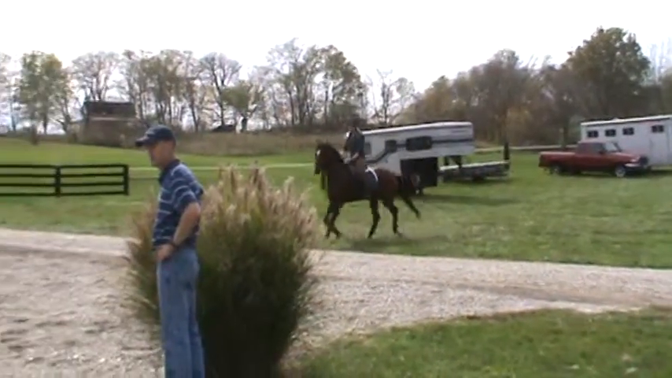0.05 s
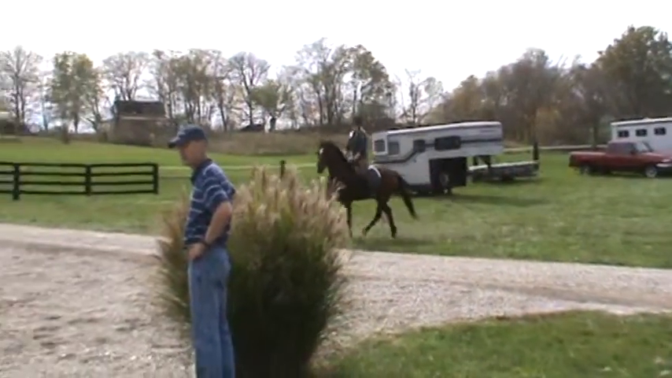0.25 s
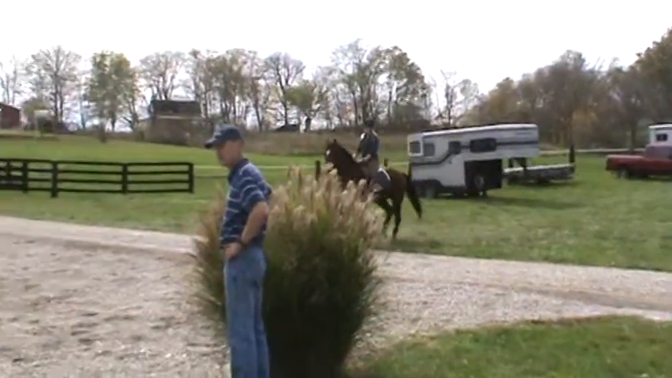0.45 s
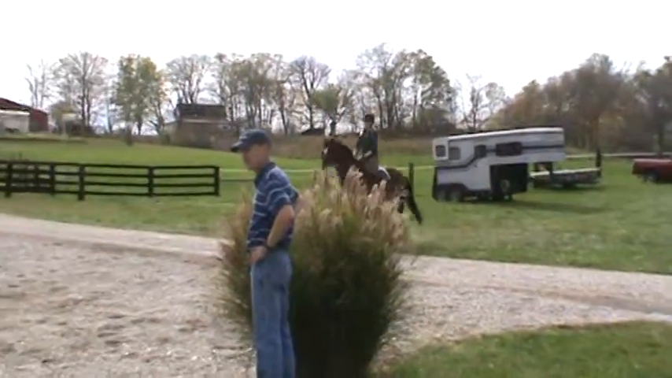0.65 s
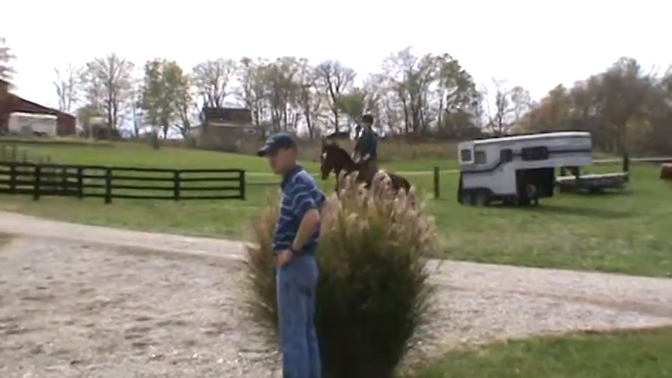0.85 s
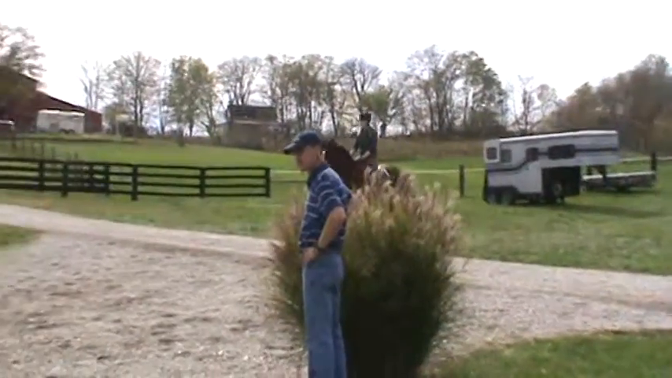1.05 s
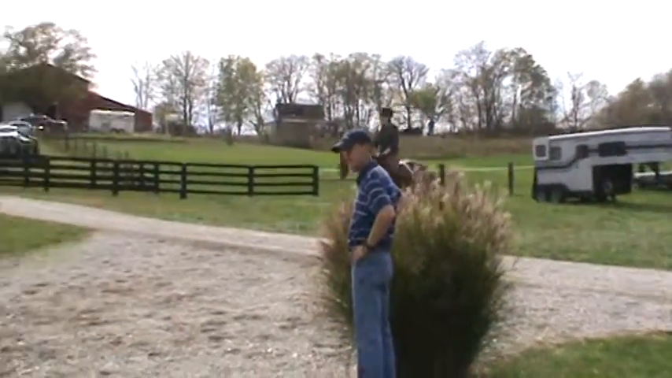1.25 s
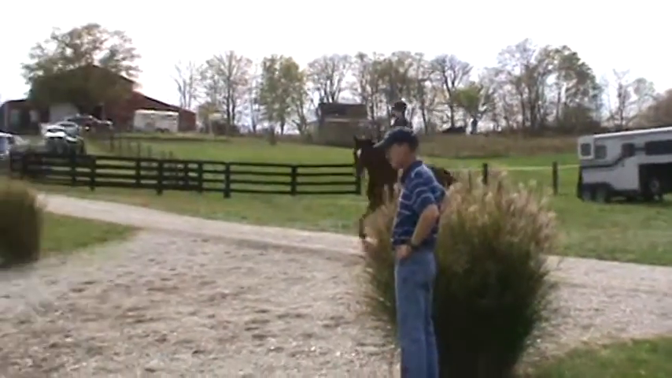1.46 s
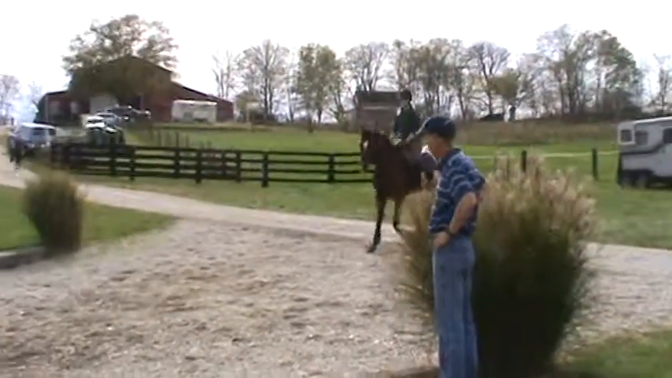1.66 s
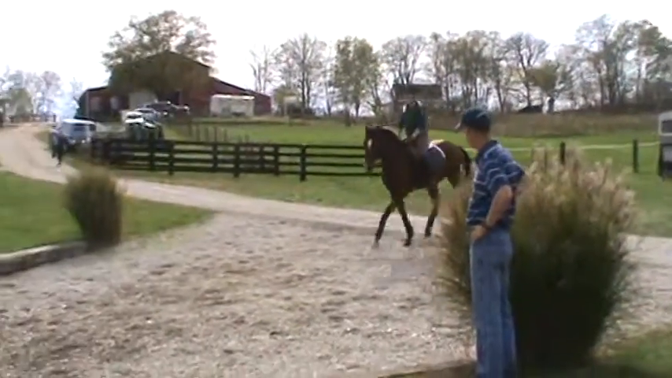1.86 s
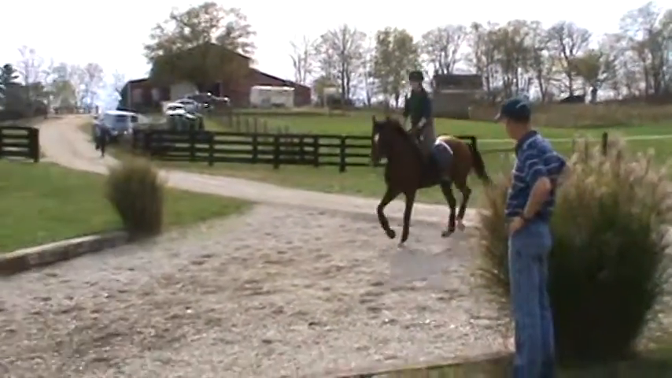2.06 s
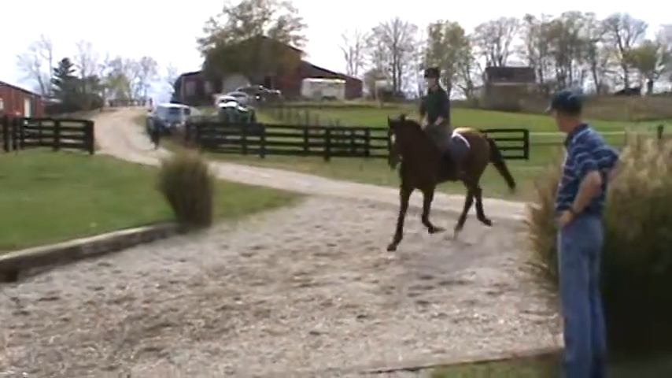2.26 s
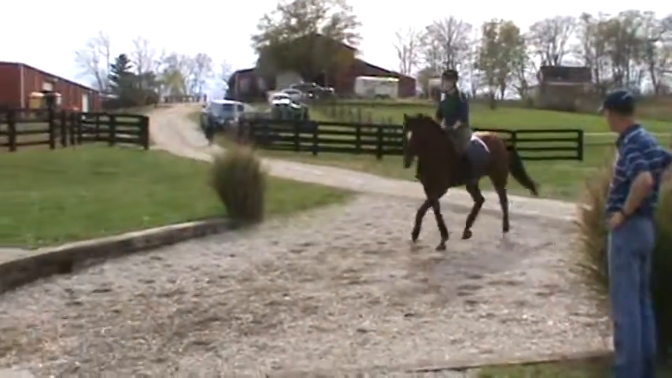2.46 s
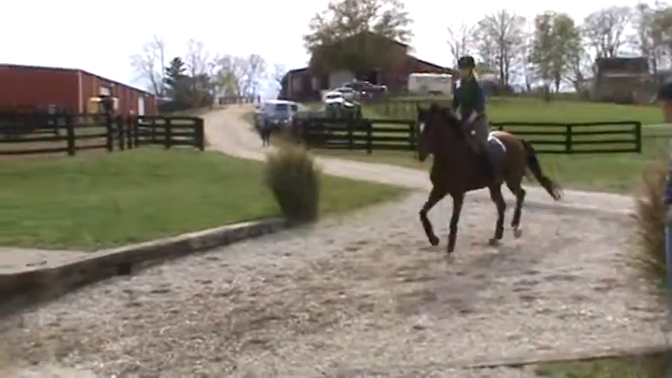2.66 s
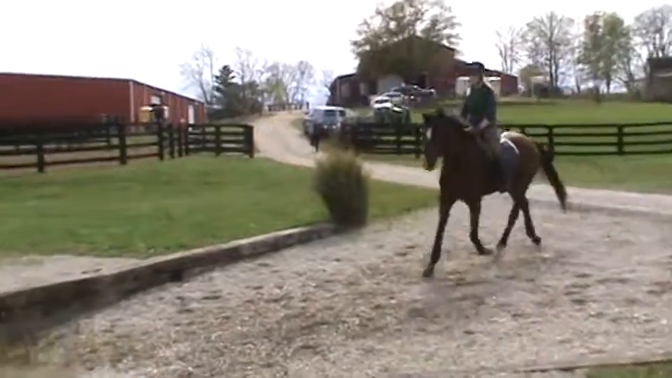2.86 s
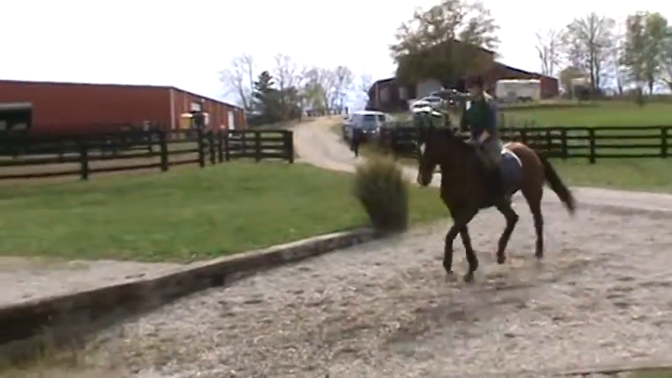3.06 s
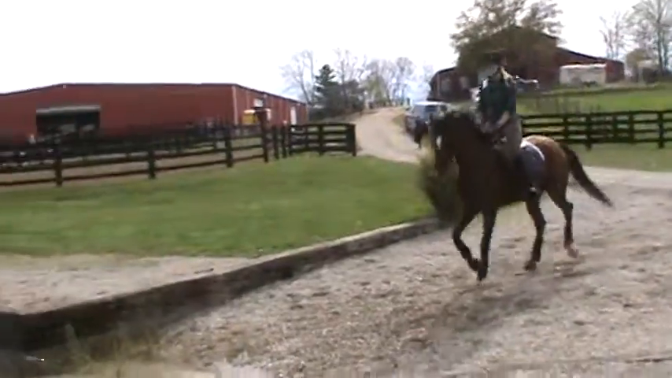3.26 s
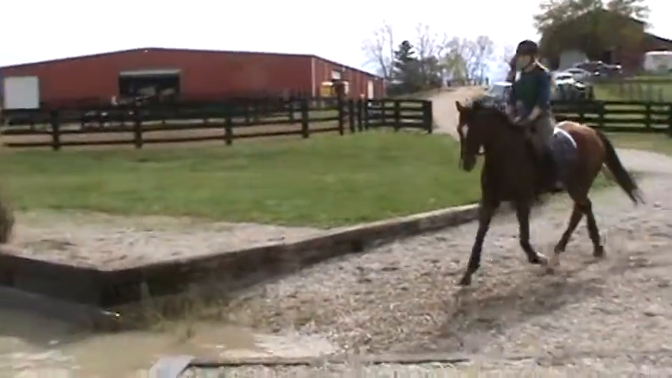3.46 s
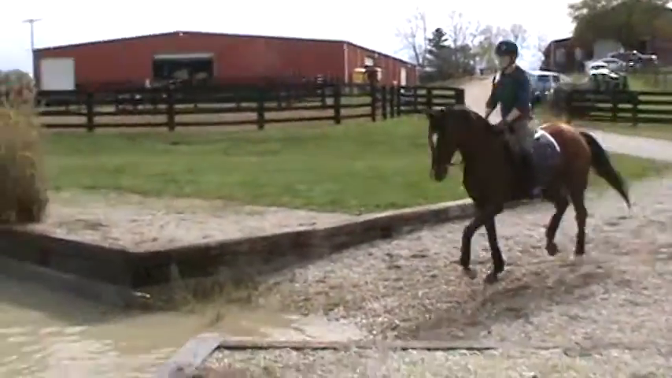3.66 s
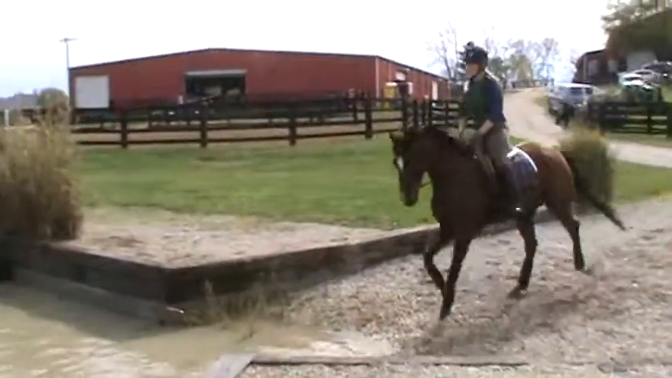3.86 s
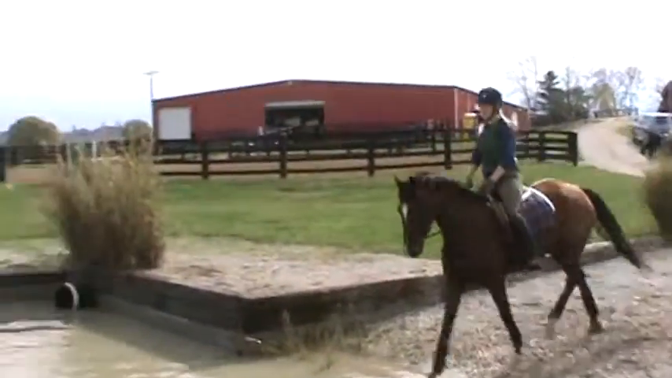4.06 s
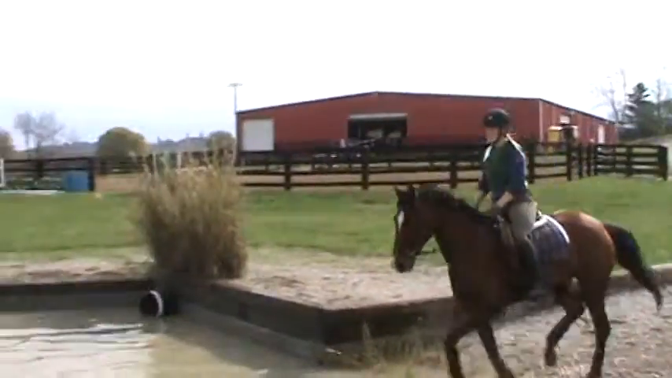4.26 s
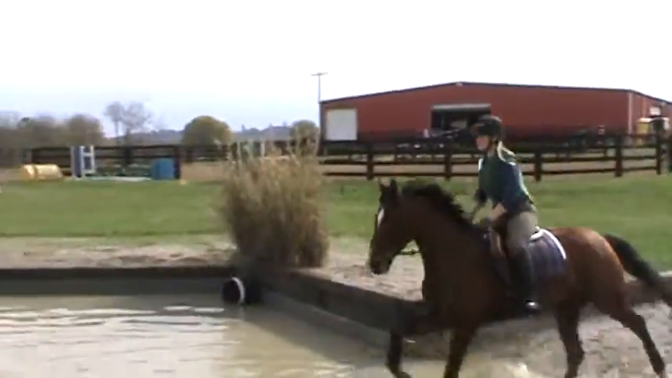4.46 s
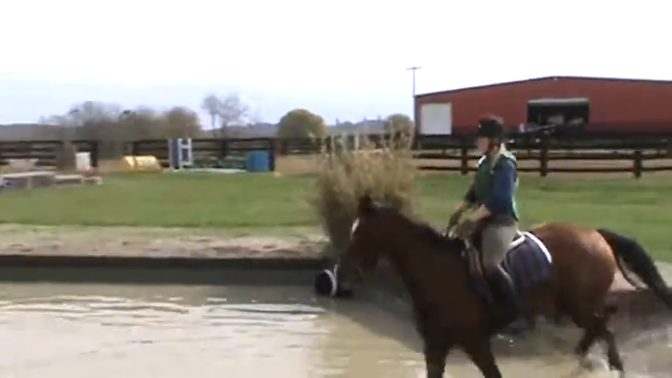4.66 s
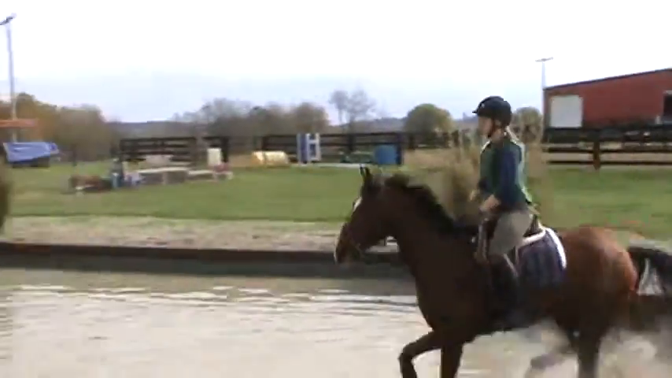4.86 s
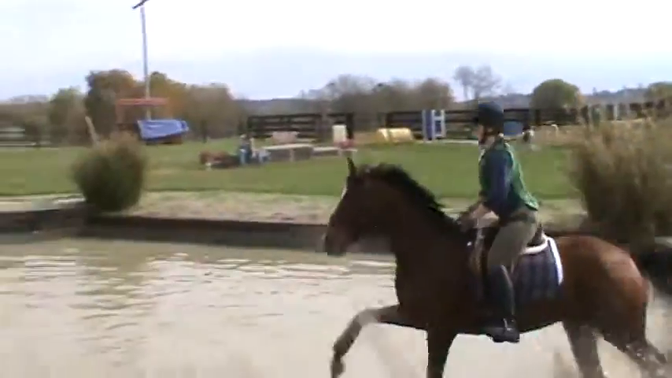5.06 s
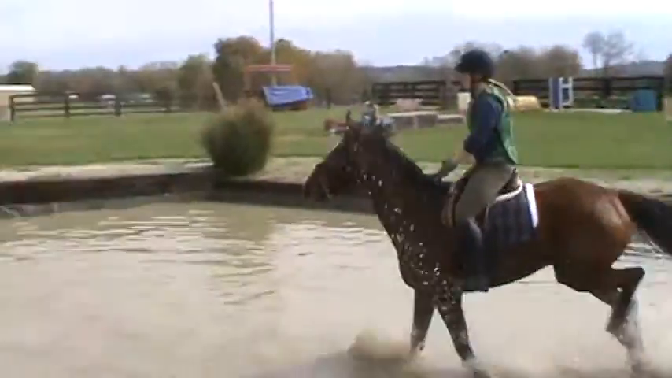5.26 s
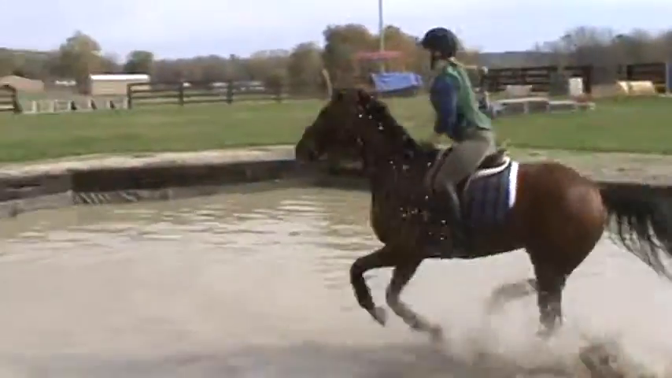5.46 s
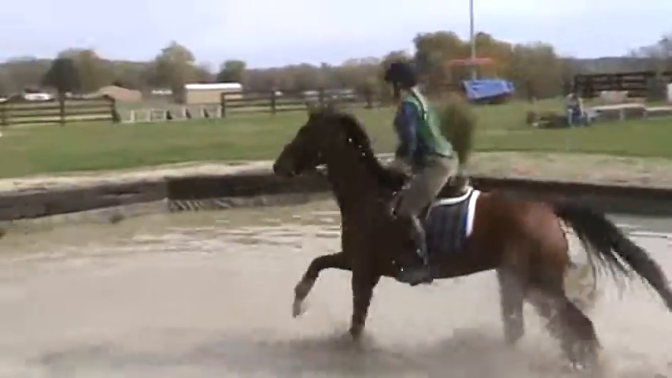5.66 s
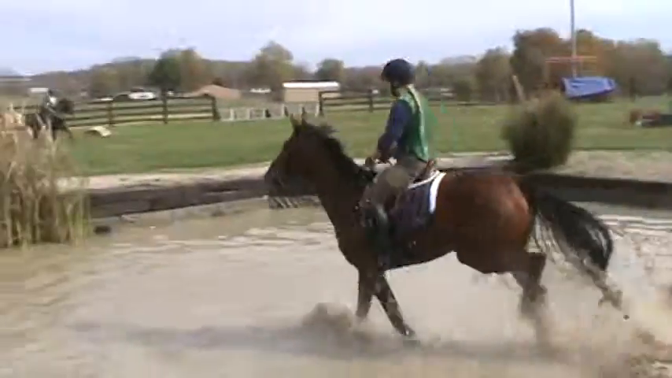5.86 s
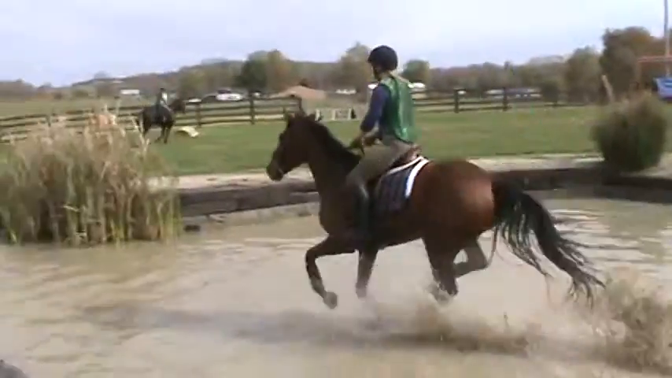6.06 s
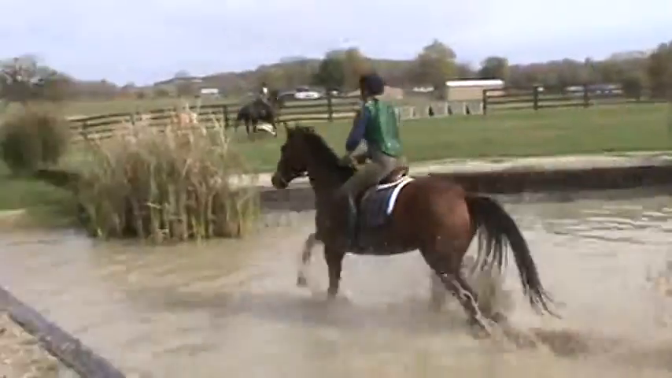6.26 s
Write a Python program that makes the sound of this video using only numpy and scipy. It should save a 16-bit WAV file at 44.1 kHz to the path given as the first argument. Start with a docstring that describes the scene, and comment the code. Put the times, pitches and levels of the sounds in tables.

```python
"""A horse trots over a gravel track in an open field, comes close and canters through a shallow water jump.
Its hooves thud, crunch gravel and crack on stones; in the water they punch air pockets that gulp,
and throw up lumps and spray that rain back, made of dense grains of noise and ringing bubbles.
At first the splashing of an earlier pass fades away on the left. Light wind on the microphone is low noise
in smooth swells, one of them the low thump of a hoof at the water's edge, over the even hush of the field."""
import sys
import numpy as np
from scipy import signal
from scipy.fft import rfft, irfft, next_fast_len
from scipy.io import wavfile

SR = 44100
rng = np.random.default_rng(int(sys.argv[2]) if len(sys.argv) > 2 else 0)


def generate_wav(sig):
    """Save sig (samples, or channels by samples) to the path in sys.argv[1] as 16-bit PCM at SR."""
    pcm = np.round(np.clip(np.atleast_2d(sig).T, -1, 1) * 32767).astype(np.int16)
    wavfile.write(sys.argv[1], SR, pcm)


N = 278712
TIME = np.arange(N) / SR
FFT_SIZE = next_fast_len(N + 8192)
BINS_HZ = np.maximum(np.arange(FFT_SIZE // 2 + 1) * SR / FFT_SIZE, 1)
CUTOFF_HZ = 16000


def from_db(db):
    """Decibels to gain."""
    return 10 ** (np.asarray(db) / 20)


def rms_one(x):
    """Scale to unit power."""
    return x / np.sqrt(np.mean(x ** 2) + 1e-20)


def gains(curve):
    """Level curve as a gain in time, with a brief Gaussian fade outside its span."""
    s, db = np.transpose(curve)
    outside_s = np.maximum(s[0] - TIME, 0) + np.maximum(TIME - s[-1], 0)
    return from_db(np.interp(TIME, s, db)) * np.exp(-(outside_s / .03) ** 2)


def at_bins(points):
    """Table over frequency, interpolated on a log axis."""
    hz, value = np.transpose(points)
    return np.interp(np.log(BINS_HZ), np.log(hz), value)


def filtered(x, gain):
    """Apply a gain per frequency."""
    return irfft(rfft(x, FFT_SIZE) * gain, FFT_SIZE)[..., :N]


def band(low_hz, high_hz):
    """Steep band-pass gain; two bands that share an edge sum to about even power there."""
    return 1 / np.sqrt((1 + (low_hz / BINS_HZ) ** 10) * (1 + (BINS_HZ / high_hz) ** 10))


def pan(left_db):
    """Left and right gains for a level difference, with a mean of 1."""
    pair = from_db(np.array([[.5], [-.5]]) * left_db)
    return pair / pair.mean(axis=0)


def stereo(pair, gain, likeness, left_db):
    """Two unrelated signals become a coloured stereo sound whose middle has unit power."""
    alike = np.clip(likeness, -.9, .995)
    mid, side = rfft(pair, FFT_SIZE) * gain
    spread = np.sqrt((1 - alike) / (1 + alike)) * side
    both = irfft((mid + spread * [[1], [-1]]) * pan(left_db), FFT_SIZE)[:, :N]
    return both / np.std(both.mean(axis=0))


def drift(knots_per_s):
    """Random values of spread 1, joined by straight lines."""
    knots = rng.standard_normal(4096)
    return np.interp(TIME * knots_per_s, np.arange(len(knots)), knots)


def add(out, s, sound):
    """Mix a short sound in at time s."""
    start = int(s * SR)
    out[start:start + len(sound)] += sound[:max(N - start, 0)]


def bursts(rows, rise_s, t60_s):
    """Each event (time, level) starts a burst that swells and dies; their powers add."""
    power, age_s = np.zeros(N), TIME[:SR]
    shape = (1 - np.exp(-age_s / rise_s)) * from_db(-60 * age_s / t60_s)
    for s, db, *_ in rows:
        add(power, s, (from_db(db) * shape / shape.max()) ** 2)
    return np.sqrt(power)


def during(rows, curve):
    """Events within the span of a curve."""
    return [row for row in rows if curve[0][0] - .05 <= row[0] <= curve[-1][0]]


def grains(per_s, spread_db, clump_db):
    """Two streams of tiny impacts of uneven size that arrive in clumps."""
    sizes = from_db(spread_db * np.minimum(rng.exponential(1, (2, N)), 5))
    signs = rng.choice([-1, 1], (2, N))
    hits = rng.random((2, N)) < per_s / SR
    return sizes * signs * hits * from_db(clump_db * drift(120))


def speckle(per_s, spread_db, clump_db, patchy_db):
    """Grains dealt to seven registers: each drop or pebble ticks in one, and each register flutters by itself."""
    clicks, out = grains(per_s, spread_db, clump_db), 0
    edges_hz = [60, 600, 1200, 2200, 3800, 6500, 10500, 17000]
    dealt = rng.integers(0, len(edges_hz) - 1, N)
    for k, pair in enumerate(zip(edges_hz, edges_hz[1:])):
        own = clicks * (dealt == k) * from_db(patchy_db * drift(90))
        register = signal.butter(2, pair, "band", fs=SR, output="sos")
        out = out + signal.sosfilt(register, own + 1e-18)
    return out


def pocket(hz, cycles, rise, swell=1):
    """A pocket of air or soil swells, rings and dies, its pitch rising as it shrinks.
    More swell rounds the start and shortens the tail."""
    life_s = cycles / hz
    age = np.arange(int((2 + 7 / swell) * life_s * SR)) / SR / life_s  # in lives
    envelope = (age * np.exp(1 - age)) ** swell
    swing = envelope * np.cos(2 * np.pi * hz * life_s * age * (1 + rise * age))
    return -np.gradient(swing) * SR / (2 * np.pi * hz)  # pressure follows the change of flow


def pockets(rows, rise, swell, ratio=1):
    """Each blow (time, level, pitch, cycles) rings a pocket at its pitch times the ratio."""
    out = np.zeros(N)
    for s, db, hz, cycles, *_ in rows:
        add(out, s, from_db(db) * pocket(hz * ratio, cycles, rise, swell))
    return out


def heave(rows, hz, cycles):
    """Each blow also heaves the ground or water around it, always at the same low pitch."""
    return pockets([(s, db, hz, cycles) for s, db, *_ in rows], rise=0, swell=1)


def bubbles(per_s, low_hz, high_hz, cycles, spread_db):
    """Small bubbles or pebbles ping at random pitches, each in its own place; unit power."""
    out = np.zeros((2, N))
    for when, pitch, size, place in rng.random((int(per_s * N / SR), 4)):
        hz = low_hz * (high_hz / low_hz) ** pitch
        ping = from_db(-spread_db * np.log(size + .01)) * pocket(hz, cycles, rise=.015)
        add(out[0], when * N / SR, ping * (1 + place))
        add(out[1], when * N / SR, ping * (2 - place))
    return rms_one(out)


# spectrum of the open field: (frequency [Hz], density [dB per Hz])
FIELD_COLOUR = [(25, 2), (60, 6), (170, -1.5), (290, -2.5), (700, -10), (1000, -12.5), (3100, -17),
                (6500, -22.5), (11000, -20.5), (16000, -28.5)]
FIELD_DB = -50


def field_hush():
    """Steady coloured noise, nearly alike on both sides."""
    return from_db(FIELD_DB) * stereo(rng.standard_normal((2, N)), from_db(at_bins(FIELD_COLOUR)), 0.99, 0)


# spectrum of wind on the microphone: (frequency [Hz], density [dB per Hz])
WIND_COLOUR = [(20, -4), (45, 4.5), (80, 5.5), (130, 2), (300, -43), (900, -56)]
# gusts, and one brief low thump of a hoof at the water's edge (4.443 s):
# (time of the peak [s], half length [s], level [dB])
LOW_SWELLS = [(0.38, 0.33, -34), (0.718, 0.074, -32.5), (1.392, 0.11, -33), (2.11, 0.057, -51),
              (4.443, 0.027, -34), (4.86, 0.2, -40.5), (5.273, 0.082, -31.5), (6.0, 0.24, -38)]
BREEZE_DB = -71   # between the swells, on their scale


def wind_and_edge_thump():
    """Low noise, unlike on the two sides, with fast lumps under smooth swells: wind, and one hoof thump."""
    blow = from_db(BREEZE_DB) + sum(from_db(db) * np.exp(-((TIME - s) / length_s) ** 2)
                                    for s, length_s, db in LOW_SWELLS)
    rumble = stereo(rng.standard_normal((2, N)), from_db(at_bins(WIND_COLOUR)), -0.057, 0)
    lumps = from_db(2.0 * drift(24))
    return from_db(-2.5) * blow * rumble * lumps


# short spatters of flung drops: (time [s], level [dB], fine against coarse drops [dB])
SPATTERS = [(0.126, -29, -9.5), (0.181, -28.5, -12), (0.976, -44, 3), (1.03, -37, 1.5), (1.123, -30.5, -7),
            (1.17, -40, -20), (1.24, -34.5, -4), (1.28, -38, -26), (1.393, -39, 1), (1.409, -42, -9),
            (1.688, -38, -6), (4.452, -29.5, -2.5), (4.508, -28, -28), (4.707, -23, -26), (4.784, -22, -3),
            (5.016, -30, 7.5), (5.044, -20, -5), (5.184, -30, -19), (5.272, -32, 9.5), (5.436, -18, -4.5),
            (5.456, -22, -14), (5.594, -20.5, -7), (5.612, -27, 2), (5.848, -19, -7), (6.006, -21, 0),
            (6.216, -20, -10), (6.246, -20.5, -12), (6.267, -17, -18)]
SPATTER_RISE_S, SPATTER_T60_S = 0.0019, 0.13


def spatters(curve, tint, alike, left_db):
    """A handful of flung water lands at once: coarse drops crackle, fine ones fizz."""
    rows = during(SPATTERS, curve)
    drops = speckle(per_s=14000, spread_db=0.7, clump_db=-2.0, patchy_db=-0.5)
    coarse = bursts(rows, SPATTER_RISE_S, SPATTER_T60_S)
    fine = bursts([(s, db + fine_db) for s, db, fine_db in rows], SPATTER_RISE_S, SPATTER_T60_S)
    crackle = coarse * stereo(drops, tint * band(1350, 4500), alike, left_db)
    fizz = fine * stereo(drops, tint * band(5100, 16500), alike, left_db)
    return crackle + fizz


# sheets of spray that rain back: (time [s], level [dB])
SPRAYS = [(0.39, -35), (0.48, -32), (1.02, -50), (4.745, -27), (4.84, -26), (4.92, -31.5), (5.19, -29),
          (5.36, -23), (5.42, -26), (5.66, -26), (5.93, -25), (6.02, -27), (6.13, -30), (6.225, -30.5)]
SPRAY_RISE_S, SPRAY_T60_S = 0.029, 0.33
SLOSH_DB, SLOSH_RISE_S, SLOSH_T60_S = -14, 0.0023, 0.13
PATTER_DB, PATTER_RISE_S, PATTER_T60_S = -16.5, 0.0016, 0.1


def thrown_water(curve):
    """Envelopes of thrown water: gulps set it sloshing, slaps throw lumps that patter, sheets of spray rain."""
    slosh = from_db(SLOSH_DB) * bursts(during(GULPS, curve), SLOSH_RISE_S, SLOSH_T60_S)
    patter = from_db(PATTER_DB) * bursts(during(SLAPS, curve), PATTER_RISE_S, PATTER_T60_S)
    spray = bursts(during(SPRAYS, curve), SPRAY_RISE_S, SPRAY_T60_S)
    return slosh, patter, spray


# bands of slosh, patter and spray: (low edge [Hz], high edge [Hz])
ZONES = [(70, 500), (500, 2500), (2500, 16500)]
SLOSH_SETTLES = 0.53   # extra dB that heavy slosh loses per dB of churning lost


def water(curve, colour, likeness, left_db, wash_db, bubble_db, gurgle_db, drip_db, spatter_db,
          drops_per_s, drop_spread_db, clump_db):
    """Slosh, patter and spray, each a wash plus thrown bursts, the finer the denser; bubbles ring above."""
    churn, out = gains(curve), 0
    heavy = churn * (churn / churn.max()) ** SLOSH_SETTLES
    washes, thrown = (heavy, churn, churn), thrown_water(curve)
    tint, alike = from_db(at_bins(colour)), at_bins(likeness)
    for wash, burst, zone, db, per_s in zip(washes, thrown, ZONES, wash_db, drops_per_s):
        grain = speckle(per_s, drop_spread_db, clump_db, patchy_db=1.15)
        drops = stereo(grain, tint * band(*zone), alike, left_db)
        out = out + np.hypot(from_db(db) * wash, burst) * drops
    out = out + from_db(spatter_db) * spatters(curve, tint, alike, left_db)
    pings = bubbles(per_s=110, low_hz=611.6, high_hz=3440, cycles=3.1, spread_db=-0.5)
    gurgles = bubbles(per_s=39, low_hz=127.0, high_hz=412, cycles=0.83, spread_db=2.0)
    drips = bubbles(per_s=70, low_hz=1297, high_hz=4820, cycles=5.7, spread_db=3.0)
    ringing = from_db(bubble_db) * pings + from_db(gurgle_db) * gurgles + from_db(drip_db) * drips
    return out + heavy * filtered(ringing, pan(left_db))


# churning left by the earlier pass: (time [s], level [dB])
FADING = [(0.0, -27.5), (0.47, -26.5), (0.92, -30), (1.29, -32), (1.75, -37), (1.9, -42), (2.06, -45.5),
          (2.2, -54)]
# its spectrum: (frequency [Hz], density [dB per Hz])
FADING_COLOUR = [(35, -35), (60, -1.5), (149, -3), (244, -5.5), (338, -1), (946, -6.5), (1350, -12.5),
                 (1750, -7), (2400, -14.5), (5330, -22.5), (8510, -29.5), (11300, -29.5), (16000, -37)]
# left-right likeness, limited in stereo(): (frequency [Hz], likeness [-])
FADING_LIKENESS = [(60, .5), (150, 0.7), (480, .92), (800, 1.1), (1300, -0.5), (1900, 0.8), (3000, 0.1),
                   (4300, 0.15), (6000, 0.4), (9000, -.5), (12000, 0.7), (15000, .9)]
# balance: (frequency [Hz], left minus right [dB])
FADING_BALANCE = [(60, 1), (130, -3), (290, 2.5), (690, 9.5), (1150, 16), (1700, 9), (2400, 15),
                  (3300, 13.5), (6500, -0.5), (8400, -0.5), (10500, -9), (15000, -2)]


def fading_splashes():
    """Water of the earlier pass settles, mostly on the left."""
    return water(FADING, FADING_COLOUR, FADING_LIKENESS, at_bins(FADING_BALANCE),
                 wash_db=(-5.5, -2.5, -7.5), bubble_db=-10.0, gurgle_db=-13.5, drip_db=-16, spatter_db=-2.5,
                 drops_per_s=(2200, 3500, 14000), drop_spread_db=0.6, clump_db=1.5)


# churning as the horse wades in deeper: (time [s], level [dB])
WADING = [(4.45, -35), (4.52, -35.5), (4.57, -44), (4.62, -34), (4.74, -30), (5.3, -26), (6.32, -26)]
# its spectrum: (frequency [Hz], density [dB per Hz])
WADING_COLOUR = [(35, -46), (60, -15), (115, -3.5), (198, -0.5), (308, -0.5), (492, -8.5), (593, -6),
                 (862, -4), (1110, -12.5), (1740, -9), (2140, -14), (4530, -18.5), (6140, -23),
                 (7230, -20.5), (11000, -24), (16000, -34.5)]
# left-right likeness, limited in stereo(): (frequency [Hz], likeness [-])
NEAR_LIKENESS = [(60, .1), (170, 1), (500, 0.77), (1900, 0.91), (4400, 0.9), (6200, 0.73), (8200, 1),
                 (15000, 0.95)]


def wading_splashes():
    """The legs churn the water close by; ports() then sets them aside."""
    return water(WADING, WADING_COLOUR, NEAR_LIKENESS, 0,
                 wash_db=(-4.5, 1.0, -2.8), bubble_db=-5.0, gurgle_db=-5.5, drip_db=-10.5, spatter_db=-3.5,
                 drops_per_s=(3500, 5000, 20000), drop_spread_db=1.1, clump_db=0.5)


# a hoof lands or scuffs in the gravel: (time [s], level [dB], fine against coarse [dB], t60 [s])
CRUNCHES = [(2.009, -25, -1.5, 0.1), (2.289, -29, 11.5, 0.057), (2.303, -27.5, -7, 0.17),
            (2.4193, -29.5, 3, 0.12), (2.544, -28.5, -7, 0.071), (2.6, -30, -3.5, 0.2),
            (2.648, -36, -25, 0.1), (2.729, -32.5, -6, 0.075), (2.8616, -27, -17, 0.064),
            (2.87, -29, -12, 0.053), (2.9215, -28, -9, 0.2), (3.229, -28, -9, 0.24),
            (3.475, -21, -24, 0.081), (3.5488, -23, -8, 0.16), (3.574, -29.5, -19, 0.12),
            (3.668, -39, -1, 0.2), (3.783, -21.5, -27, 0.081), (3.834, -31, 11, 0.08),
            (3.856, -24, 0, 0.19), (3.8988, -24, -10, 0.15), (3.957, -31, -7, 0.17),
            (4.011, -34.5, -5, 0.14), (4.0942, -21, -10.5, 0.23), (4.2506, -17.5, -4.5, 0.11),
            (4.309, -30.5, -7, 0.17), (4.336, -34, 1.5, 0.19), (4.388, -36, -1, 0.13),
            (4.4157, -11.5, -10, 0.054), (4.591, -8.5, -12.5, 0.052)]
# gravel spectrum: (frequency [Hz], density [dB per Hz])
GRAVEL_COLOUR = [(90, -5.5), (200, 0.5), (320, -1), (520, -7), (680, 1.5), (950, -5), (1800, -3),
                 (2200, -6.5), (5600, -12), (6400, -19), (7300, -13.5), (10900, -15.5), (16000, -28)]
WEIGHT_DB, WEIGHT_HZ, WEIGHT_CYCLES = -20.5, 230, .64   # dull thump behind each crunch
GRIT_RISE_S, GRIT_T60_S = 0.033, 1.65
SHORE_S = 4.4   # only grit kicked up before this time trickles on


def gravel(rise_s, coarse_db, fine_db, grit_db, tick_db, toe_s, toe_db):
    """The toe brushes, then the hoof shoves stones: coarse ones crunch, fine ones hiss, grit trickles on."""
    coarse, fine, weight = np.zeros((3, N))
    age_s = TIME[:SR // 2]
    for s, db, bright_db, t60_s in CRUNCHES:
        shove = from_db(db) * (1 - np.exp(-age_s / rise_s)) * from_db(-60 * age_s / t60_s)
        add(coarse, s - toe_s, shove * from_db(toe_db))
        add(coarse, s, shove)
        add(fine, s, shove * from_db(bright_db))
        add(weight, s, from_db(db + WEIGHT_DB) * pocket(WEIGHT_HZ, WEIGHT_CYCLES, rise=0))
    colour = from_db(at_bins(GRAVEL_COLOUR))
    pebbles = speckle(per_s=5000, spread_db=1.5, clump_db=-0.5, patchy_db=-1.5)
    sand = speckle(per_s=18000, spread_db=3.5, clump_db=-1.0, patchy_db=6.0)
    grit = speckle(per_s=4000, spread_db=3.0, clump_db=3.5, patchy_db=5.5)
    crunch = from_db(coarse_db) * coarse * stereo(pebbles, colour * band(76, 6800), 0.98, 0)
    hiss = from_db(fine_db) * fine * stereo(sand, colour * band(4900, 16500), 0.98, 0)
    trickle = from_db(grit_db) * stereo(grit, colour * band(350, 16500), 0.46, 0)
    ticks = from_db(tick_db) * bubbles(per_s=120, low_hz=484, high_hz=2400, cycles=0.95, spread_db=1.0)
    loose = bursts([row for row in CRUNCHES if row[0] < SHORE_S], GRIT_RISE_S, GRIT_T60_S)
    return weight + crunch + hiss + loose * (trickle + ticks)


# single stones struck by a shoe: (time [s], level [dB], pitch [Hz])
STONES = [(2.2903, -15, 10600), (2.3206, -23, 3250), (2.356, -27, 1980), (2.429, -12, 4600),
          (2.4475, -21, 4600), (2.709, -23.5, 1500), (2.749, -21, 6000), (2.870, -20.5, 3000),
          (2.926, -14.5, 3820), (3.203, -23, 1760), (3.2275, -16, 3600), (3.477, -20, 3050),
          (3.521, -26, 5000), (3.5521, -19, 1870), (3.654, -32, 7000), (3.748, -26, 11100),
          (3.787, -20, 1640), (3.8193, -29, 2480), (3.899, -32, 3040), (3.9575, -38, 2380),
          (4.01, -30, 1800), (4.075, -20.5, 1200), (4.104, -11, 1590), (4.3411, -28, 6000)]
STONE_WIDTH = 1.86   # band edges of the crack, as a ratio to the pitch


def stone_clicks(t60_s, crack_db, ring_db, cycles):
    """A shoe cracks on a single stone, which rings for an instant: the smaller the stone, the higher both."""
    out, age_s = np.zeros(N), TIME[:SR // 50]
    for s, db, hz in STONES:
        edges_hz = [hz / STONE_WIDTH, min(hz * STONE_WIDTH, CUTOFF_HZ)]
        around = signal.butter(1, edges_hz, "band", fs=SR, output="sos")
        crack = rms_one(signal.sosfilt(around, rng.standard_normal(len(age_s))))
        add(out, s, from_db(db + crack_db - 60 * age_s / t60_s) * crack)
        add(out, s, from_db(db + ring_db) * pocket(hz, cycles, rise=0))
    return out


CRACK_DB, BRIGHTEST_CRACK_HZ, SHOE_HZ = -39, 4500, 1485


def shoe_cracks(t60_s, ring_db, cycles):
    """Hard thuds crack, and the shoe rings briefly; soft ones only knock."""
    out, age_s = np.zeros(N), TIME[:SR // 50]
    for s, db, *_, hard_db in THUDS:
        decay = from_db(db + hard_db + CRACK_DB - 60 * age_s / t60_s)
        add(out, s, decay * rng.standard_normal(len(age_s)))
        add(out, s, from_db(db + hard_db + ring_db) * pocket(SHOE_HZ, cycles, rise=0))
    return signal.sosfilt(signal.butter(2, BRIGHTEST_CRACK_HZ, fs=SR, output="sos"), out)


# hooves on firm ground: (time [s], level [dB], pitch [Hz], ringing [cycles], hardness [dB])
THUDS = [(1.968, -37.5, 181, .6, -20), (2.521, -39, 208, 0.71, -17), (2.5855, -26.5, 710, 0.76, -17),
         (2.607, -21.5, 560, 0.7, -15), (2.7298, -29, 646, 1.4, 0), (2.8206, -32, 694, 1.2, 5),
         (2.9864, -31.5, 318, 0.63, -8), (3.0172, -25, 450, 0.82, -20), (3.047, -32, 650, 0.95, -9),
         (3.221, -31.5, 307, 0.68, 3), (3.338, -34, 113, 0.61, -20), (3.478, -29, 705, .7, 1),
         (3.711, -31, 423, 0.97, -15), (3.7212, -26.5, 590, 0.93, -8), (3.759, -38, 800, 1.0, -17),
         (3.965, -26.5, 420, 0.44, -10), (4.1012, -4, 620, .85, 2), (4.1645, -20.5, 291, 0.64, -15),
         (4.4398, -7.5, 225, 0.57, -19), (4.5938, -7, 726, 0.7, -5)]
BOOM_DB, BOOM_HZ = -18.5, 86.5


def thuds():
    """Soil rings for about a cycle at each blow, and the ground gives at two fixed low pitches."""
    knock = pockets(THUDS, rise=0.0013, swell=1.52)
    ground = from_db(-15.5) * heave(THUDS, hz=166, cycles=0.29)
    boom = from_db(BOOM_DB) * heave(THUDS, BOOM_HZ, cycles=0.15)
    return knock + ground + boom


# deepest air pockets punched into the water: (time [s], level [dB], start pitch [Hz], ringing [cycles])
GULPS = [(0.0032, -6.5, 164, 0.37), (0.1537, -14.5, 220, 0.64), (0.1901, -16, 255, 1.65),
         (0.2739, -18, 141, 0.62), (0.3008, -18, 253, 1.4), (0.4097, -18, 138, 0.76),
         (0.4312, -19.5, 142, 1.5), (0.4512, -18.5, 236, 1.7), (0.5284, -20, 149, 1.8),
         (0.5812, -14, 209, 0.46), (0.6151, -17, 140, 0.7), (0.872, -23, 156, 0.63), (0.939, -21, 297, 0.6),
         (1.1147, -18.5, 198, 1.64), (1.395, -29.5, 220, 0.86), (4.505, -21.5, 250, 0.7),
         (4.7061, -13, 240, 1.2), (4.8479, -20.5, 220, 2.1), (4.8703, -10.5, 224, 1.16),
         (4.8892, -5.5, 212, 0.76), (5.0012, -14, 171, 0.55), (5.0424, -14.5, 272, 1.04),
         (5.1719, -11.5, 275, 0.82), (5.1861, -18.5, 223, 1.3), (5.2535, -14.5, 161, 0.79),
         (5.2666, -14, 291, 1.7), (5.3143, -12.5, 380, 0.54), (5.46, -12.5, 198, 1.5),
         (5.497, -15, 380, 0.6), (5.5937, -8.5, 182, 0.52), (5.743, -15.0, 335, 0.77),
         (5.7736, -10.0, 235, 0.7), (5.8316, -16, 159, 1.1), (5.8889, -10.5, 138, 0.59),
         (5.9119, -11.5, 258, 1.2), (6.018, -21, 197, 1), (6.0441, -14, 195, 1.6), (6.0602, -19, 242, 1.9),
         (6.0761, -20, 240, 2.2), (6.1978, -16, 209, 1), (6.2132, -17.5, 150, 0.43),
         (6.2448, -19, 238, 1.4), (6.2579, -11.5, 240, 1.7)]


def gulps():
    """Air pockets ring with rising pitch, each with a smaller bubble above it: long ones bloop, short ones thump."""
    small = pockets(GULPS, rise=0.0087, swell=1.5, ratio=2.42)
    return pockets(GULPS, rise=0.0086, swell=2.4) + from_db(-14.5) * small


# hooves slapping the water, or the wet gravel just before it: (time [s], level [dB], start pitch [Hz])
SLAPS = [(0.0126, -26, 540), (0.125, -19, 1080), (0.1778, -16.5, 582), (0.2008, -17.5, 866),
         (0.4272, -17, 652), (0.6224, -21.0, 570), (0.9803, -24, 770), (1.252, -21.5, 950),
         (1.3987, -26, 818), (4.133, -26, 800), (4.165, -21, 1040), (4.187, -27, 1040), (4.442, -15.5, 667),
         (4.457, -24, 636), (4.8925, -14.5, 652), (4.961, -16, 730), (5.0175, -10, 780),
         (5.0494, -13.5, 850), (5.1717, -13, 680), (5.2332, -15.5, 818), (5.2983, -14, 860),
         (5.3114, -9.5, 773), (5.4214, -12.5, 720), (5.4602, -12.5, 780), (5.4926, -12.5, 546),
         (5.5925, -12, 805), (5.6121, -9, 786), (5.7356, -14, 773), (5.7726, -18, 730),
         (5.8998, -16.5, 735), (6.0558, -11.0, 690), (6.1045, -19, 810), (6.214, -7, 740),
         (6.2393, -12, 780)]
SLAP_CYCLES = 1.6


def slaps():
    """Each slap rings a shallow pocket and heaves the water or ground around it."""
    smack = pockets([(*row, SLAP_CYCLES) for row in SLAPS], rise=0.0067, swell=2.06)
    return smack + from_db(-17) * heave(SLAPS, hz=260, cycles=0.22)


def scatter(x, t60_s, level_db):
    """Banks and water surface send back a short, dull tail, different on each side."""
    age_s = TIME[:SR // 5]
    noise = rng.standard_normal((2, len(age_s)))
    tail = signal.sosfilt(signal.butter(1, 2500, fs=SR, output="sos"), noise)
    tail = tail * from_db(-60 * age_s / t60_s) * (age_s > .003)
    tail = tail / np.sqrt(np.sum(tail ** 2) / 2)
    return x + from_db(level_db) * signal.fftconvolve(x[None], tail, axes=1)[:, :N]


def hoof_blows():
    """Thuds, gulps and slaps, softened because soil and water yield, with their short echo."""
    hooves = from_db(-1.5) * thuds() + from_db(-0.6) * gulps() + from_db(0.3) * slaps()
    hooves = signal.sosfilt(signal.butter(2, 2800, fs=SR, output="sos"), hooves)
    hooves = scatter(hooves, t60_s=0.06, level_db=-15.0)
    return hooves * pan(np.interp(TIME, [1.6, 2.2], [4.0, 0]))  # early splashes lie to the left


# ripples of the microphone housing: (frequency [Hz], width [Hz], level [dB])
HOUSING = [(440, 75, -1), (875, 320, -0.5), (1400, 460, -2.5), (1760, 280, 1), (2100, 100, -5.5),
           (3250, 210, 4), (3650, 610, -3.5), (4300, 640, 2), (5135, 310, -9), (5650, 400, -0.5),
           (6300, 720, -9.5), (8160, 910, 2), (9400, 1350, -3), (11430, 2030, 6)]


def housing(x):
    """Sound from straight ahead picks up the peaks and notches of the microphone housing."""
    for hz, width_hz, db in HOUSING:
        b, a = signal.iirpeak(hz, hz / width_hz, fs=SR)
        x = x + (from_db(db) - 1) * signal.lfilter(b, a, x + 1e-18)
    return x


# notches at the left port for sound from the right: (frequency [Hz], width [Hz], level [dB])
SHADOW = [(475, 220, -22), (1040, 360, -22), (2090, 190, -26), (2780, 300, -7.5), (3600, 730, -12),
          (4900, 1000, -11), (6000, 250, -20)]


def ports(x):
    """As the horse moves right, its sound reaches the left port round the housing, which notches it."""
    shade = 1
    for hz, width_hz, db in SHADOW:
        detune = 1j * (BINS_HZ ** 2 - hz ** 2) / (BINS_HZ * width_hz)
        shade = shade * (from_db(db) + detune) / (1 + detune)
    aside = np.interp(TIME, [2.0, 3.9, 4.4], [.3, .6, 1])
    side = filtered(x.mean(axis=0), (shade - 1) / (shade + 1))  # full aside: left / right = shade
    return x + aside * side * [[1], [-1]]


def scene():
    """Field, wind and fading splashes, then the horse on gravel and in the water."""
    background = field_hush() + wind_and_edge_thump() + fading_splashes()
    ground = gravel(rise_s=0.003, coarse_db=-6.5, fine_db=-6.0, grit_db=-28.0, tick_db=-33,
                    toe_s=0.0091, toe_db=-15.0)
    ground = ground + stone_clicks(t60_s=0.0085, crack_db=-11.5, ring_db=-13.0, cycles=2.2)
    ground = ground + shoe_cracks(t60_s=0.011, ring_db=-11.0, cycles=1.8)
    horse = wading_splashes() + ground + hoof_blows()
    return background + ports(housing(horse))


def record(dry):
    """Cut the top steeply at CUTOFF_HZ."""
    return filtered(dry, 1 / np.sqrt(1 + (BINS_HZ / CUTOFF_HZ) ** 200))


dry = scene()
out = record(dry)
generate_wav(out)
```